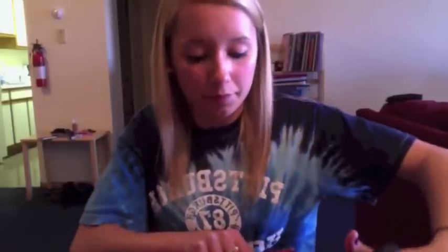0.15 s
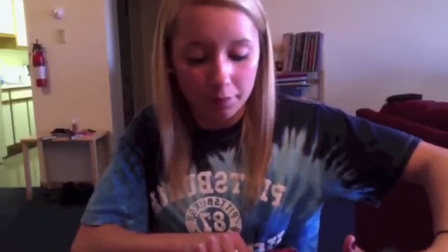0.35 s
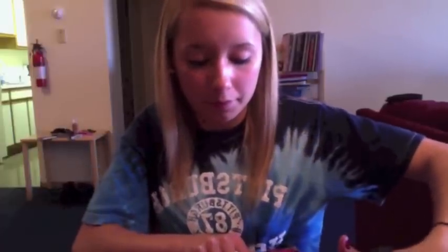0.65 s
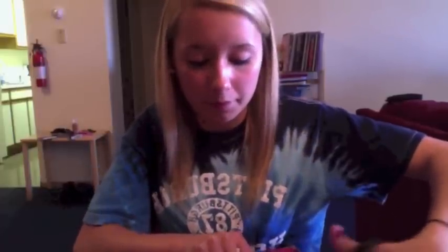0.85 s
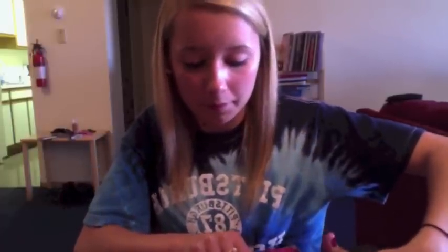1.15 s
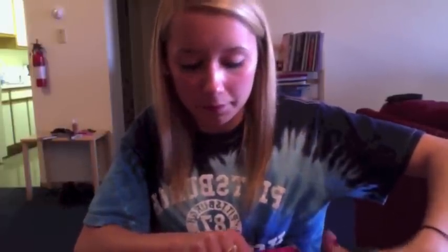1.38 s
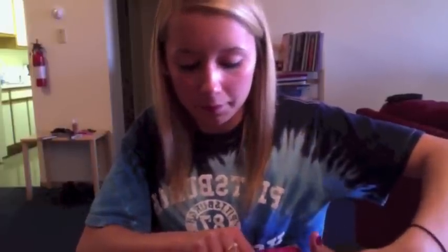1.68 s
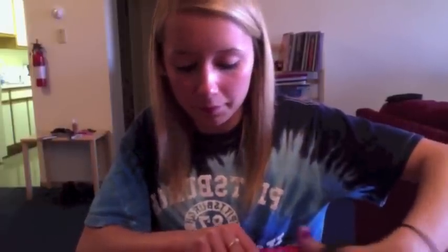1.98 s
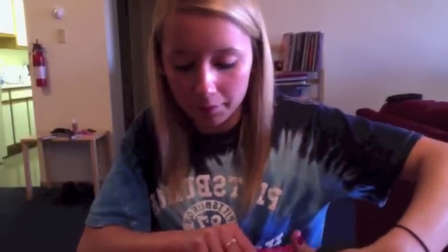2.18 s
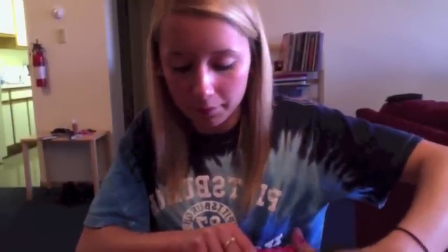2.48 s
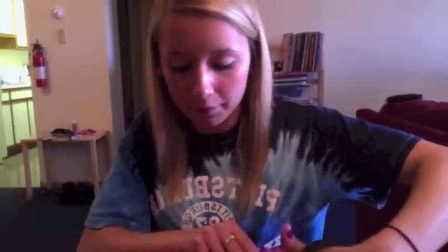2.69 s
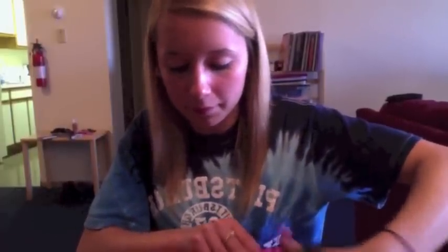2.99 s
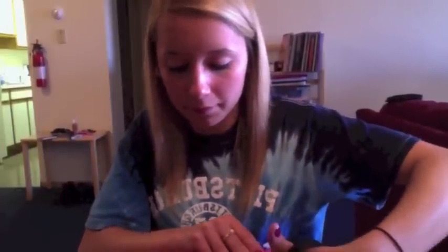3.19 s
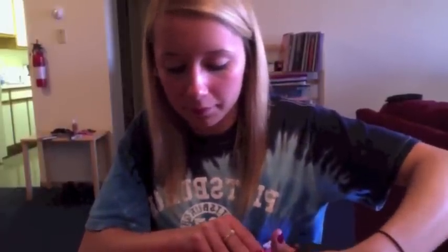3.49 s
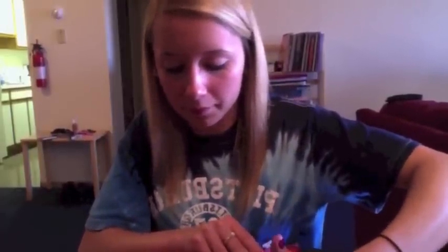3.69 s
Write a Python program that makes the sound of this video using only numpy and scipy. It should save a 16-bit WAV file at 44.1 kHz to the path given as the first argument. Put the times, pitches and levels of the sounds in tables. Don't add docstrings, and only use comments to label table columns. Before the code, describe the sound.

Scissors cut corrugated cardboard close to a small microphone in a quiet, slightly live room. Faint ticks lead to small bites at 0.4-0.75 s. Crunchy snips, each a rapid run of hollow, woody snaps, come around 1.0, 1.55, 2.15 and 2.65 s, then a longer one at 3.2-3.57. Grainy scrapes fall between. A last bite at 3.7 precedes tiny pivot squeaks; low hum throughout.

```python
import sys
import numpy as np
from scipy import signal
from scipy.fft import rfft, irfft
from scipy.io import wavfile

SR = 44100
rng = np.random.default_rng(int(sys.argv[2]) if len(sys.argv) > 2 else 0)


def materialize(psi):
    bounded = np.clip(np.atleast_2d(psi).T, -1, 1)
    quanta = np.round(bounded * 32767).astype(np.int16)
    wavfile.write(sys.argv[1], SR, quanta)


def magnitude_from_level(level_db):
    exponent = np.asarray(level_db, float) / 20
    return 10 ** exponent


N = 169785


def at_hz(points, hz):
    p = np.array(points)
    return np.interp(np.log(hz + 1), np.log(p[:, 0]), p[:, 1])


def rms_one(x):
    return x / np.sqrt(np.mean(x ** 2) + 1e-20)


def causal(db):
    c = irfft(db * np.log(10) / 20)
    half = len(c) // 2
    folded = np.r_[c[0], 2 * c[1:half], c[half], np.zeros(half - 1)]
    return np.exp(rfft(folded))


def modes(table, hz, scatter_db):
    response = 0
    for (f, db, t60), extra_db in zip(table, scatter_db):
        width_hz = np.log(1000) / t60 / np.pi
        response = response + magnitude_from_level(db + extra_db) * 1j * hz / (width_hz * 1j * hz + f ** 2 - hz ** 2)
    return response / np.sqrt(np.mean(np.abs(response) ** 2))


def grains(size, per_s, spread_db):
    force = magnitude_from_level(spread_db * np.minimum(rng.exponential(1, size), 5)) * rng.choice([-1, 1], size)
    return rms_one(force * (rng.random(size) < per_s / SR))


def gate(t, length, attack, release):
    return np.clip(t / attack, 0, 1) ** 2 * np.exp(-np.maximum(t - length, 0) / release)


def wander(size, knots):
    return np.interp(np.linspace(0, knots - 1, size), np.arange(knots), rng.standard_normal(knots))


def add(out, s, x):
    i = int(max(s, 0) * SR)
    out[i:i + len(x)] += x


# (pitch [Hz], width [Hz], level [dB])
RUBBED_PEAKS = [(950, 200, 4), (1280, 200, -4), (1580, 220, 6), (3300, 400, 3), (4600, 450, 7),
                (6500, 1400, 5), (8600, 900, -5), (10400, 1100, 7), (13500, 4000, -9)]


def resonances(hz, peaks=RUBBED_PEAKS):
    return sum(db / (1 + (2 * (hz - f) / width) ** 2) for f, width, db in peaks)


# (time [s], peak level [dB], length [s], board ring level [dB], brightness [dB per octave])
NIBBLE = [
    (0.373, -16.5, 0.0098, -29.5, -0.5),
    (0.3985, -17.5, 0.0068, -31, -4.5),
    (0.417, -27, 0.015, -44, 3),
    (0.4931, -19, 0.0041, -30.5, -1.5),
    (0.731, -22, 0.008, -38.5, -13.5),
    (1.87, -15, 0.0082, -39.5, -14),
]
SNIP_A = [(1.0186, -21, 0.0089, -40, -3.5), (1.0291, -20, 0.0047, -31.5, -4.5),
          (1.049, -12, 0.013, -24, -4), (1.061, -34, 0.0074, -39, -11),
          (1.0784, -21.5, 0.0067, -22.5, -5.5), (1.1054, -12, 0.0091, -16.5, -8.5),
          (1.128, -24, 0.0069, -36, -8), (1.135, -18.5, 0.0068, -27, -12), (1.1535, -16.5, 0.008, -29, -9),
          (1.182, -18, 0.0095, -33, -18), (1.1902, -15, 0.0081, -22.5, -4), (1.206, -31, 0.0065, -39.5, -8)]
SNIP_B = [(1.5454, -31.5, 0.0066, -49.5, -6), (1.5588, -30, 0.0066, -46.5, -6),
          (1.5812, -16, 0.013, -34, -8.5), (1.588, -15.5, 0.01, -27, -11),
          (1.6021, -11.5, 0.0048, -22.5, -7.5), (1.614, -17, 0.0087, -25.5, -17.5),
          (1.6323, -8.5, 0.0099, -22.5, -6.5), (1.6474, -16, 0.00724, -24.5, -10),
          (1.6606, -20, 0.0082, -25, -8), (1.6771, -8.5, 0.0079, -21, -7)]
SNIP_C = [(2.152, -10.5, 0.0068, -20, -6), (2.1604, -10, 0.011, -28, -11), (2.1744, -14.5, 0.0062, -30, -4),
          (2.1834, -8.5, 0.0059, -19, -8.5), (2.1934, -11.5, 0.011, -28.5, -8.5),
          (2.2054, -18.5, 0.0068, -27.5, -6.5), (2.2275, -13, 0.0078, -19.5, -8),
          (2.262, -33, 0.0077, -32.5, -15)]
SNIP_D = [(2.6545, -12.5, 0.011, -27.5, -7), (2.6725, -13, 0.012, -21.5, -8.5),
          (2.6864, -6.5, 0.0094, -24.5, -20), (2.6994, -17, 0.01, -25, -32),
          (2.7136, -14, 0.01, -39, -16.5), (2.721, -13.5, 0.0067, -26.5, -9.5),
          (2.7328, -15.5, 0.0055, -28.5, -5.5), (2.7566, -14, 0.0066, -20.5, -5.5)]
SNIP_E = [(3.1921, -31, 0.0065, -49, -3), (3.2177, -16.5, 0.0071, -33, -6),
          (3.2676, -12.5, 0.0093, -26.5, -4.5), (3.279, -18.5, 0.0083, -27, -5.5),
          (3.2957, -17.5, 0.0072, -34, -4), (3.3371, -16, 0.0081, -31.5, -8),
          (3.342, -25, 0.0056, -29, -16), (3.358, -41, .006, -48, -12), (3.3921, -11.5, 0.0084, -23, -6),
          (3.4256, -18, 0.0089, -35, -6), (3.4366, -16.5, 0.0099, -29, -7.5),
          (3.4585, -18, 0.0081, -37, -7), (3.475, -17, 0.0053, -32, -9.5), (3.4962, -25, 0.0092, -39, 0.5),
          (3.558, -18, 0.0062, -38.5, -8.5), (3.565, -22.5, 0.0054, -32, -10)]
LAST_BITE = [
    (3.695, -13, 0.0052, -34.5, -10),
    (3.725, -36, 0.0062, -43, -3.5),
    (3.8173, -37, 0.0077, -57.5, -10),
    (3.845, -36, 0.0056, -53, -5.5),
]
# (table thump against crush [dB], lean of board modes [dB per octave],
# loudest board pitch [Hz], where the blades grip)
GRIPS = [
    (-22.5, -1.5, 594, "open"),
    (-16.5, -2.5, 713, "open"),
    (-18, 5.5, 640, "mid"),
    (-13, 2.5, 730, "mid"),
    (-9, -2, 673, "mid"),
    (-7.5, 1, 640, "tips"),
    (-3, 6.5, 400, "tips"),
]
BLADE_PEAKS = {"open": [(1300, 410, -6.5), (1630, 190, 4), (2090, 110, 6), (3290, 270, 3.5),
               (4890, 290, 7.5), (5900, 430, 4.5), (7700, 290, 5.5)], "mid": [(1256, 450, -4),
               (1670, 170, 4.5), (2370, 350, 5.5), (3650, 240, 7.5), (4500, 200, 6), (5640, 360, 4.5),
               (7550, 330, 7), (9940, 910, 8)], "tips": [(1934, 660, 9), (3300, 400, 5), (4300, 200, 6.5),
               (5800, 400, 6), (6600, 270, 0), (7500, 300, 1.5), (8740, 320, 9.5), (10500, 300, 6)]}
# (pitch [Hz], level per Hz [dB])
CRUSH_COLOUR = [(650, -33), (1100, 1.5), (2950, -6.5), (3680, -5.5), (4020, -6.5), (4900, -7),
                (15500, -20.5)]
# (pitch [Hz], level [dB], ring time to -60 dB [s])
BOARD_MODES = [(378, -25, 0.028), (427.3, -10.5, 0.087), (479, -9.5, 0.15), (552, -13, 0.087),
               (615, -2.5, 0.048), (666.2, 2.5, 0.054), (719, -3.5, 0.055), (811.5, 5, 0.046),
               (903, -2.5, 0.065), (980, -40, 0.022)]
# (pitch [Hz], level [dB], ring time to -60 dB [s])
TABLE_MODES = [(104, -8, 0.068), (153, 3.5, 0.062), (200, 2, 0.061), (240.7, -5, 0.17)]
CRUSH_LEAD_S, CRUSH_RELEASE_S, CRUSH_DB = 0.0003, 0.0031, -4.5
CRUSH_RISE, STRIKE_AT = 0.6, 0.31
TILT_DB, BLADE_SHARE = 6.5, 0.12
RING_DB, RING_SCATTER_DB, RING_BUILD_S = 5, 5, 0.0029
RING_STRIKE_S, STRIKE_ROUGH = 0.0062, 0.6
FAVOUR_DB, FAVOUR_WIDTH_HZ = 7, 126
DETUNE, BLADE_SCATTER = 0.028, 0.38
THUMP_LAG_S, THUMP_TOP_HZ = 0.0041, 265
BOARD_LOW_HZ, BOARD_TOP_HZ = 353, 1170
PATCH_DB = 0.5


def crushes():
    out, size = np.zeros(N + SR), 8192
    t, hz = np.arange(size) / SR, np.fft.rfftfreq(size, 1 / SR)
    soft = causal(-10 * np.log10(1 + (hz / THUMP_TOP_HZ) ** 6))
    soft = soft * np.exp(-2j * np.pi * hz * THUMP_LAG_S)
    board_top = 1 + (hz / BOARD_TOP_HZ) ** 6
    board_bottom = 1 + (BOARD_LOW_HZ / (hz + 10)) ** 6
    board_range = causal(-10 * np.log10(board_top * board_bottom))
    board_hz = np.array(BOARD_MODES)[:, 0]
    shared_db = at_hz(CRUSH_COLOUR, hz) + BLADE_SHARE * resonances(hz)
    snips = [NIBBLE, SNIP_A, SNIP_B, SNIP_C, SNIP_D, SNIP_E, LAST_BITE]
    for snip, (thump_db, lean_db, loud_hz, grip) in zip(snips, GRIPS):
        lean = lean_db * np.log2(board_hz / 700)
        lean = lean + resonances(board_hz, [(loud_hz, FAVOUR_WIDTH_HZ, FAVOUR_DB)])
        for s, db, length, ring_db, tilt_db in snip:
            rise = CRUSH_RISE * length
            push = gate(t, rise, length, CRUSH_RELEASE_S)
            burst = grains(size, per_s=16000, spread_db=2.5) * push

            strike_s = rise * STRIKE_AT
            blow = np.sqrt(np.sum(push ** 2)) * np.exp(-2j * np.pi * hz * strike_s)

            peaks = []
            for f, width, peak_db in BLADE_PEAKS[grip]:
                moved_hz = f * (1 + DETUNE * rng.standard_normal())
                peaks.append((moved_hz, width, peak_db * (1 + BLADE_SCATTER * rng.standard_normal())))
            tear_db = shared_db + resonances(hz, peaks) + PATCH_DB * wander(len(hz), knots=30)
            tear = causal(tear_db + (TILT_DB + tilt_db) * np.log2((hz + 500) / 3500))
            tear = tear / np.sqrt(np.mean(np.abs(tear) ** 2))

            table_scatter = RING_SCATTER_DB * rng.standard_normal(len(TABLE_MODES))
            thump = soft * magnitude_from_level(thump_db) * modes(TABLE_MODES, hz, table_scatter)

            detuned_hz = hz * (1 + DETUNE * rng.standard_normal())
            board_scatter = lean + RING_SCATTER_DB * rng.standard_normal(len(BOARD_MODES))
            board = modes(BOARD_MODES, detuned_hz, board_scatter)
            strike = blow + STRIKE_ROUGH * rfft(burst * np.exp(-t / RING_STRIKE_S))
            ring = irfft(strike * board * board_range)
            ring = ring * (1 - np.exp(-np.maximum(t - strike_s, 0) / RING_BUILD_S))
            ring = ring / np.abs(ring).max()

            body = irfft(rfft(burst) * tear - blow * thump)
            crush = magnitude_from_level(db + CRUSH_DB) * body + magnitude_from_level(RING_DB + ring_db) * ring
            add(out, s - CRUSH_LEAD_S - rise / 2, crush)
    return out[:N]


# (start time [s], length [s], level [dB], swell from start to end [dB], board drone level [dB])
SLIDES = [(0.363, 0.097, -42.5, -26, -1), (0.719, 0.15, -32, 7.5, -3), (0.869, 0.12, -46, -26.5, 6),
          (1.003, 0.24, -51.5, -9, 10), (1.304, 0.13, -35, 4, -8), (1.555, 0.027, -40.5, 9, 10),
          (1.62, .13, -50.5, -4, 11), (1.843, 0.14, -34.5, 4, 3), (1.98, 0.053, -50.5, -6, -19),
          (2.026, 0.12, -52, 17, 3), (2.089, 0.027, -41, 4, 2), (2.138, 0.097, -35.5, -23, -1),
          (2.235, .05, -50, -1, -11), (2.371, 0.13, -37, 8, -1), (2.575, 0.086, -53.5, -5, -8),
          (2.643, 0.078, -31, -2, -1), (2.885, 0.15, -40, -6, -15), (3.123, 0.17, -51.5, 2, 8.5),
          (3.26, 0.21, -60, -13, 4), (3.71, 1, -58, -3, -3)]
# (pitch [Hz], level per Hz [dB])
SCRAPE_COLOUR = [(71, -37), (120, -25), (312, -13), (812, -4), (1270, -9.5), (1530, -3.5), (1950, -1.5),
                 (4480, -7.5), (15500, -17.5)]
SLIDE_ATTACK_S, SLIDE_RELEASE_S, SLIDE_ARCH_DB = 0.011, 0.0038, 8.5
SLIDE_WOBBLE_DB, SLIDE_DRIFT_DB = 3, 1
DRONE_HZ, EDGE_DULL_HZ = [602, 1220], 5000


def slides():
    t, hz = np.arange(N) / SR, np.fft.rfftfreq(N + 1, 1 / SR)
    colour_db = at_hz(SCRAPE_COLOUR, hz) + resonances(hz) + 2 * wander(len(hz), knots=150)
    snaps = grains(N + 1, per_s=14000, spread_db=1.5)
    rub = rms_one(irfft(rfft(snaps) * causal(colour_db))[:N])
    dull = signal.sosfiltfilt(signal.butter(1, EDGE_DULL_HZ, fs=SR, output="sos"), rub)
    mid = signal.sosfiltfilt(signal.butter(1, 2 * EDGE_DULL_HZ, fs=SR, output="sos"), rub)
    drone = signal.sosfilt(signal.butter(2, DRONE_HZ, "band", fs=SR, output="sos"), rub)

    power = speed = drone_power = 0
    for s, length, db, swell_db, drone_db in SLIDES:
        u = np.clip((t - s) / length, 0, 1)
        shape_db = db + swell_db * (u - 0.5) - SLIDE_ARCH_DB * (2 * u - 1) ** 2
        stroke = (magnitude_from_level(shape_db) * gate(t - s, length, SLIDE_ATTACK_S, SLIDE_RELEASE_S)) ** 2
        power = power + stroke
        drone_power = drone_power + stroke * magnitude_from_level(2 * drone_db)
        speed = speed + np.sin(np.pi * u) ** 0.5

    wobble = []
    for _ in range(4):
        quick_db = SLIDE_WOBBLE_DB * wander(N, knots=400)
        wobble.append(magnitude_from_level(quick_db + SLIDE_DRIFT_DB * wander(N, knots=90)))
    treble = (mid - dull) * wobble[1] + (rub - mid) * wobble[2]
    treble = treble * np.clip(speed, 0.3, 1)
    scrape = np.sqrt(power) * (dull * wobble[0] + treble)
    return scrape + np.sqrt(drone_power) * drone * wobble[3]


# (time [s], peak level [dB])
TICKS = [(0.0054, -31.5), (0.0135, -42), (0.0292, -37), (0.0463, -39.5), (0.1042, -38.5), (0.1231, -42),
         (0.2049, -49), (0.3219, -29), (0.3382, -30), (0.3507, -29), (0.5487, -48), (0.5603, -39),
         (0.8997, -33), (0.9215, -28), (.943, -33.5), (.958, -37), (0.9906, -36), (1.0108, -30),
         (2.0482, -43), (2.132, -33.5), (2.593, -50), (2.622, -37), (3.6596, -63), (3.748, -49)]
TICK_S, TICK_DB, TICK_DULL_DB, TICK_LOW_HZ = 0.0023, -1.5, -3.5, 5050
CRACKLE_PER_S, CRACKLE_DB, CRACKLE_UNTIL_S = 60, -58.5, 0.72


def ticks():
    out, size = np.zeros(N + SR), 2048
    t, hz = np.arange(size) / SR, np.fft.rfftfreq(size, 1 / SR)
    draws = rng.random((int(CRACKLE_PER_S * CRACKLE_UNTIL_S), 2))
    crackle = [(u * CRACKLE_UNTIL_S, CRACKLE_DB + 12 * v) for u, v in draws]
    for s, db in list(TICKS) + crackle:
        snap = rfft(rng.standard_normal(size) * np.exp(-t / TICK_S))
        colour_db = resonances(hz) + TICK_DULL_DB * np.log2(hz / 8000 + 0.18)
        colour_db = colour_db + PATCH_DB * wander(len(hz), knots=12)
        add(out, s, magnitude_from_level(db + TICK_DB) * irfft(snap * causal(colour_db)))
    return signal.sosfilt(signal.butter(4, TICK_LOW_HZ, "high", fs=SR, output="sos"), out[:N])


# (time [s], peak level [dB], pitch [Hz])
SQUEAKS = [
    (3.766, -47, 3240),
    (3.784, -52, 3180),
    (3.834, -40, 3130),
]
SQUEAK_T60_S, SQUEAK_DB, SQUEAK_RUB_S = 0.014, -2, 0.0046


def squeaks():
    out, size = np.zeros(N + SR), 2048
    t, hz = np.arange(size) / SR, np.fft.rfftfreq(size, 1 / SR)
    for s, db, pitch_hz in SQUEAKS:
        push = gate(t, SQUEAK_RUB_S, SQUEAK_RUB_S, SQUEAK_RUB_S)
        rub = rfft(rng.standard_normal(size) * push)
        pivot = modes([(pitch_hz, 0, SQUEAK_T60_S)], hz, [0])
        add(out, s, magnitude_from_level(db + SQUEAK_DB) * irfft(rub * pivot))
    return out[:N]


ROOM_DB, ROOM_GAP_S, ROOM_SPLIT_HZ = -14.5, 0.0059, 2600
ROOM_T60_S, ROOM_HIGH_T60_S = 0.24, 0.094


def room(x):
    t = np.arange(SR // 2) / SR
    noise = rng.standard_normal(len(t))
    low = signal.sosfilt(signal.butter(1, ROOM_SPLIT_HZ, fs=SR, output="sos"), noise)
    tail = low * magnitude_from_level(-60 * t / ROOM_T60_S) + (noise - low) * magnitude_from_level(-60 * t / ROOM_HIGH_T60_S)
    tail = tail * np.clip(t / ROOM_GAP_S, 0, 1)
    return magnitude_from_level(ROOM_DB) * signal.fftconvolve(x, tail / np.sqrt(np.sum(tail ** 2)))[:N]


# (pitch [Hz], level per Hz [dB])
HUM_COLOUR = [(24, -54), (40, -23.5), (143, 3), (509, -12), (686, -2), (1280, -11), (1640, -8), (6010, -25),
              (15500, -44)]
HUM_DB = -56.5


def hum():
    hz = np.fft.rfftfreq(N + 1, 1 / SR)
    noise = rfft(rng.standard_normal(N + 1))
    return magnitude_from_level(HUM_DB) * rms_one(irfft(noise * magnitude_from_level(at_hz(HUM_COLOUR, hz)))[:N])


def scene():
    near = crushes() + slides() + ticks() + squeaks()
    return (near + room(near) + hum())[None]


def low_pass(x):
    return signal.sosfilt(signal.butter(12, 16980, fs=SR, output="sos"), x)


MIC_LOW_HZ, MIC_TOP_HZ = 83, 16000


def record(dry):
    x = signal.sosfilt(signal.butter(2, MIC_LOW_HZ, "high", fs=SR, output="sos"), dry)
    x = signal.sosfilt(signal.cheby2(10, 30, MIC_TOP_HZ, fs=SR, output="sos"), x)
    return low_pass(x)


dry = scene()
out = record(dry)
materialize(out)
```